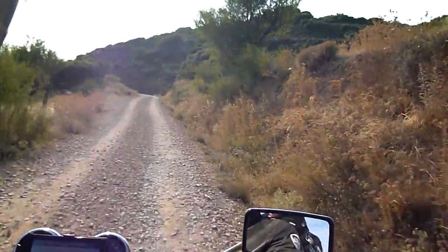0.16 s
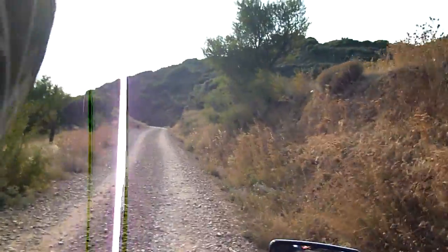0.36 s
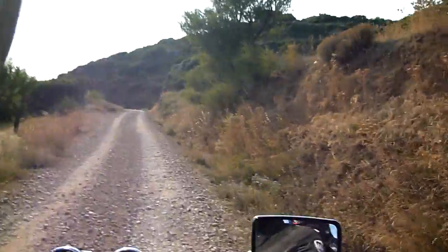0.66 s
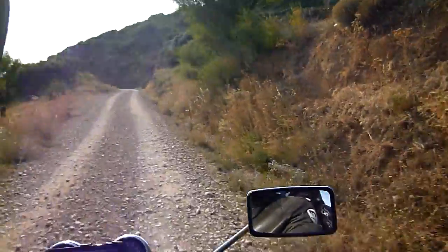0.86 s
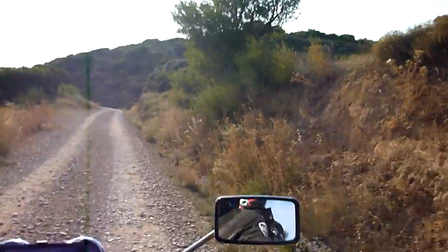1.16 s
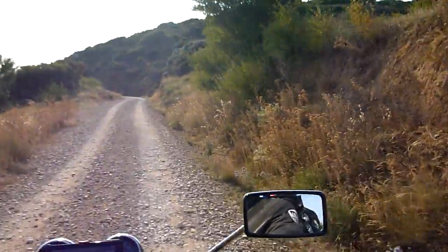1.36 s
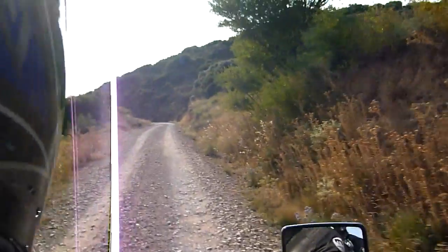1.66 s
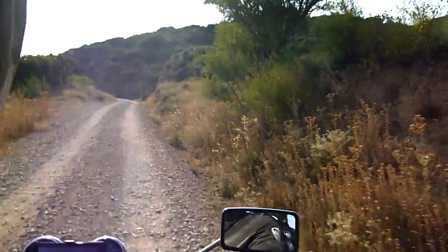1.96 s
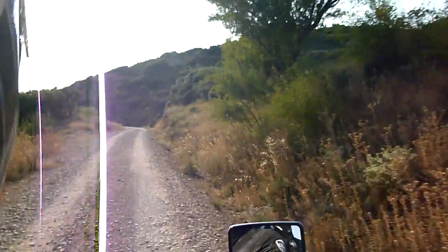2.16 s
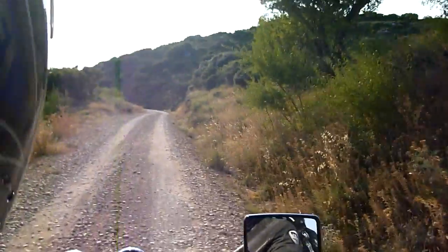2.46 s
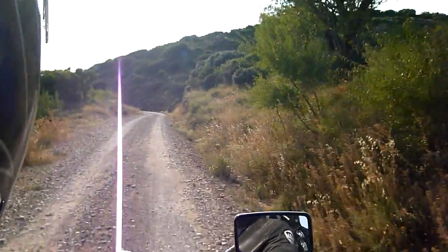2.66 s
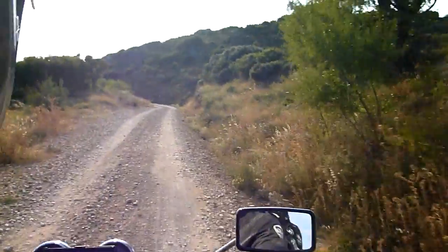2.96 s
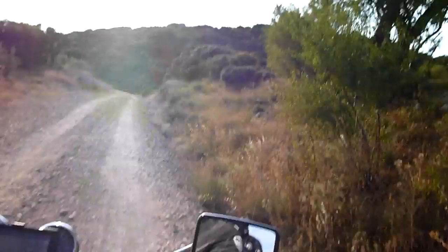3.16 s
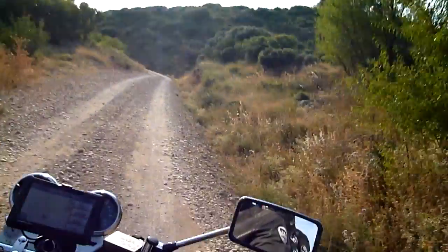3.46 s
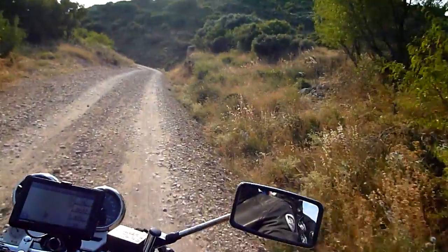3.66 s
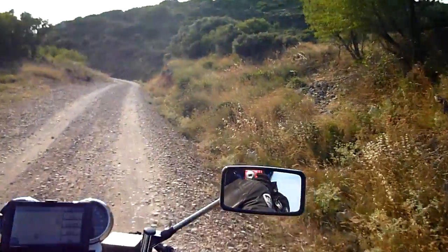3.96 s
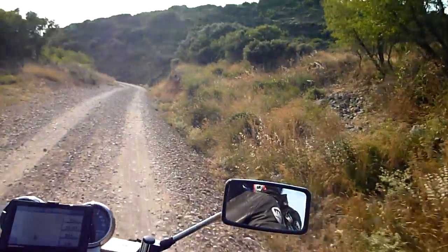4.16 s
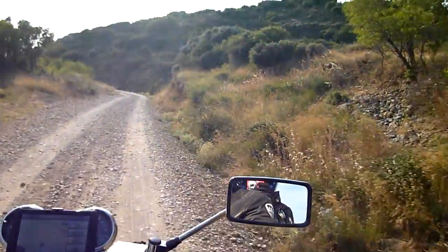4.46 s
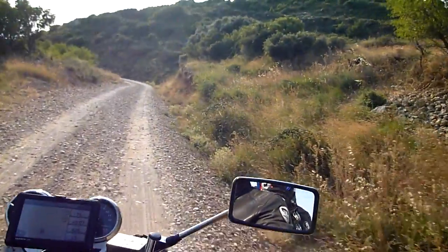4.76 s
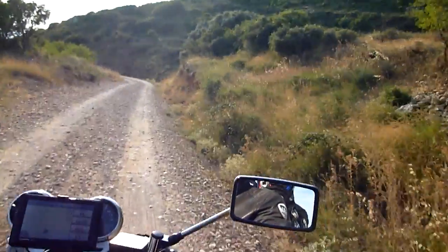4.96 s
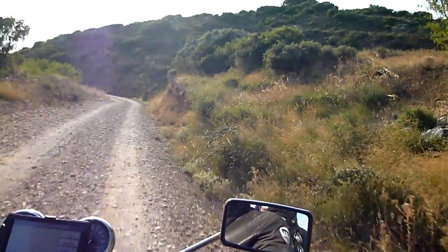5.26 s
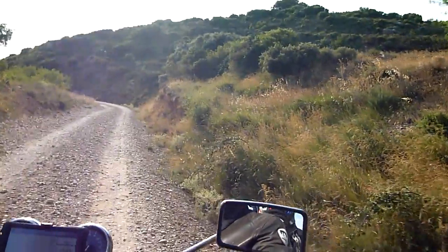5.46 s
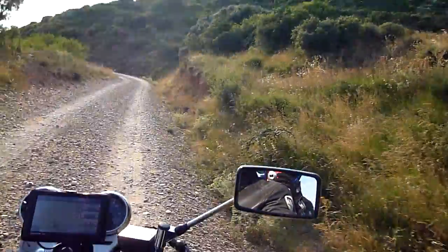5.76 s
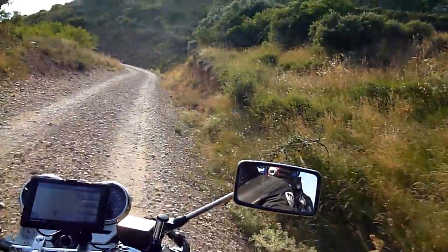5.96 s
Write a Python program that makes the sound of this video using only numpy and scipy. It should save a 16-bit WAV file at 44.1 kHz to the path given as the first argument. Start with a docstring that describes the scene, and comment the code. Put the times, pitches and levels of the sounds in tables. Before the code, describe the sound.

A low, throbbing motorcycle engine at roughly fifty beats a second, close and bassy, alternates between rough barks and dull coasting. Gravel roars and fizzes under the wheels, with dry panel knocks, a short heavy suspension thump midway, and a few metallic stone ticks. Faint bird chirps and thin insect shrilling lie far behind. The knocking thins out and the engine finally holds an even pull. Open air, dulled helmet microphone.

```python
"""Wheels rumble and crunch over gravel, a loose part knocks, and a motorcycle engine barks in short surges.
It rolls on a nearly shut throttle, pulls evenly for a while, coasts and surges again, then settles.
The engine is a train of shaped exhaust pulses over a once-a-cycle throb; the tyres are coloured noise and clicks.
Loose parts, flicked stones and a bump are struck resonances; faint insects and a bird sit beside the track.
All of it is heard through the housing of a helmet camera."""
import sys
import numpy as np
from scipy import signal
from scipy.fft import rfft, irfft
from scipy.io import wavfile
from scipy.ndimage import uniform_filter1d

SR = 44100
rng = np.random.default_rng(int(sys.argv[2]) if len(sys.argv) > 2 else 0)


def to_wav(sig):
    """Store sig (one row per channel, or 1-D mono) as 16-bit WAV at the path in sys.argv[1].

    Samples outside -1..1 are clipped; the rate is SR.
    """
    pcm = np.clip(np.atleast_2d(sig), -1, 1) * 32767
    pcm = np.round(pcm).astype(np.int16)
    wavfile.write(sys.argv[1], SR, pcm.T)  # frames by channels


N = 269451
TIME = np.arange(N) / SR

# base engine speed, held by the rolling wheels; one exhaust stroke a cycle: time_s, speed_cycles_per_s
ENGINE_SPEED = [(0, 53.1), (0.2, 54), (0.6, 54), (1.15, 54.5), (1.33, 52.9), (1.53, 53.77), (1.65, 55.9),
                (1.78, 55.22), (2.05, 54.77), (2.24, 55.27), (2.35, 54.68), (2.6, 55.23), (2.87, 56.89),
                (3.05, 54), (3.3, 52.32), (3.8, 52.74), (4.35, 50.36), (4.7, 51.4), (5.15, 49.54),
                (5.45, 47.82), (5.8, 47.9), (6.11, 48.5)]
# surges in which the cylinders fire: start_s, end_s, base level_db of the bark,
# swell_db from start to end, stumble_db of the second stroke (offset)
FIRING_SURGES = [(0.079, 0.119, -21.5, -1, 0), (0.186, 0.24, -21.5, 6, 4), (0.314, 0.351, -22.5, 3, 2.5),
                 (0.442, 0.5, -20, 2.5, -1), (0.59, 0.593, -22.5, 5, 0), (0.702, 0.79, -23.5, -4.5, -3.5),
                 (0.851, 1.077, -22.5, 0.5, -9), (1.139, 1.226, -22, 1, -1), (1.287, 1.483, -22, 0.5, 0),
                 (1.512, 1.572, -22.5, 0, 1), (1.584, 1.704, -22, -2.5, 0.5), (1.731, 2.065, -22.5, 0, 0),
                 (2.094, 2.271, -22, 2, -1.5), (2.31, 2.604, -24, -2.5, -1.5), (2.619, 2.944, -24.5, 2, 2),
                 (2.956, 3.107, -24, -0.5, 0), (3.197, 3.245, -24, 1, 1), (3.307, 3.34, -24.5, 4, 2),
                 (3.376, 3.452, -20.5, 5, -4.5), (3.618, 3.665, -23, 0, 3), (3.768, 3.806, -22, 5, 4.5),
                 (3.917, 3.955, -24.5, -5, -3), (4.068, 4.1, -27.5, -1, 2), (4.221, 4.259, -25, 0, -1),
                 (4.338, 4.383, -20.5, 0.5, -18), (4.493, 4.543, -23.5, 3.5, -10),
                 (4.654, 4.712, -21, 0.5, -9), (4.815, 4.883, -22, -1, -13), (4.978, 5.019, -23.5, -4, -7),
                 (5.143, 5.215, -21.5, -3, -25), (5.244, 5.276, -22, -1, -0.5),
                 (5.305, 5.383, -22.5, 9.5, -12), (5.413, 5.44, -22.5, 0, -3), (5.473, 5.548, -22, 4, -12),
                 (5.576, 5.608, -23, 3, 0), (5.64, 6.113, -22.5, 0, -3)]
# roar of the stones under the tyres: time_s, level_db
GRAVEL_ROAR = [(0, -43.5), (0.3, -40.5), (0.6, -47), (0.98, -37.5), (1.35, -43.5), (2.4, -43.5),
               (2.9, -42.5), (3.43, -45), (3.58, -47.5), (4.7, -49.5), (6.11, -51)]


def gain_of(db):
    """Turns decibels into amplitude."""
    return 10 ** (np.asarray(db) / 20)


def evened(x):
    """Scales to rms 1."""
    return x / np.sqrt(np.mean(x ** 2) + 1e-20)


def curve(rows):
    """Draws a time table as an automation line with a value at every sample."""
    return np.interp(TIME, *np.transpose(rows))


def read(points, hz):
    """Reads a spectrum table as gains at the given frequencies."""
    f, db = np.transpose(points)
    return gain_of(np.interp(np.log(hz + 1), np.log(f + 1), db))


def coloured(x, points):
    """Filters x through a spectrum table, at rms 1."""
    gain = read(points, np.fft.rfftfreq(N, 1 / SR))
    return evened(irfft(rfft(x) * gain, N))


def wander(hz):
    """Slow random drift of rms 1: noise through a soft lowpass at about hz."""
    f = np.fft.rfftfreq(N, 1 / SR)
    return evened(irfft(rfft(rng.standard_normal(N)) * np.exp(-(f / hz) ** 2), N))


def lagged(x, lag_s):
    """Follows x with a time constant."""
    keep = np.exp(-1 / (lag_s * SR))
    return signal.lfilter([1 - keep], [1, -keep], x)


def add(mix, s, sound):
    """Mixes a sound in at time s."""
    part = mix[max(round(s * SR), 0):][:len(sound)]
    part += sound[:len(part)]


def causal(gain):
    """The most compact pulse with these gains that starts at time zero (minimum phase)."""
    cepstrum = irfft(np.log(gain))
    size = len(cepstrum)
    cepstrum = cepstrum[:size // 2]
    cepstrum[1:] *= 2
    return irfft(np.exp(rfft(cepstrum, size)))[:size // 2]


def click(points, tilt_db, size=2048):
    """A dry click with peak 1: a spectrum table, tilted in dB per octave about 1 kHz."""
    hz = np.fft.rfftfreq(size, 1 / SR)
    tilt = gain_of(tilt_db * np.log2(np.maximum(hz, 450) / 1000))
    pulse = causal(read(points, hz) * tilt)
    return pulse / abs(pulse).max()


def strike(modes, tilt_db, scatter, grit, contact_s, crack=0, crack_s=0.00092, size=4000):
    """One blow with peak 1: after a short crack each mode rings, part pure tone and part rough chatter."""
    t = np.arange(size) / SR
    out = np.zeros(size)
    for hz, db, t60 in modes:
        detune, force, phase = rng.standard_normal(3)
        smoothing = np.hanning(SR // 250)  # 4 ms
        chatter = evened(np.convolve(rng.standard_normal(size), smoothing, "same"))
        tone = np.sin(2 * np.pi * (hz * (1 + scatter * detune) * t + phase))
        brightness_db = tilt_db * np.log2(hz / modes[0][0])
        decay_db = -60 * t / t60
        out += tone * (1 + grit * chatter) * gain_of(db + force + brightness_db + decay_db)
    out *= 1 + crack * np.exp(-t / crack_s)
    out *= 1 - np.exp(-(t / contact_s) ** 2)  # a soft contact makes no click
    return out / abs(out).max()


def bird(chirp_s=0.07, sweep=0.09, blur_hz=260):
    """A far bird gives faint chirps that rise in pitch, blurred by the scrub."""
    # start_s, level_db, centre pitch_hz
    chirps = [(1.5, -67, 6100), (1.94, -67, 7400), (2.04, -69, 6000), (2.11, -65, 6600), (2.65, -63, 7470),
              (2.826, -65, 5900), (2.915, -65, 5900), (3.015, -68, 5874), (3.099, -64, 6000),
              (3.13, -66, 6936), (3.19, -68, 6000)]
    u = np.linspace(-.5, .5, round(chirp_s * SR))
    out = np.zeros(N)
    for s, db, hz in chirps:
        phase = 2 * np.pi * np.cumsum(hz * (1 + sweep * u)) / SR
        add(out, s, gain_of(db) * np.cos(np.pi * u) * np.sin(phase))
    return out * wander(blur_hz)


def insects(patchy_db=2):
    """Insects shrill in the dry grass: band noise in patches that drift over time and pitch."""
    # time_s, level_db
    insect_level = [(0, -87.5), (2, -71), (3.45, -82), (3.75, -68.5), (4.2, -66.5), (4.8, -68.5),
                    (5.7, -69), (6.11, -74.5)]
    # frequency_hz, relative density_db_per_hz
    shrill_band = [(4000, -56.5), (5500, -10), (6000, -9.5), (7400, -7.5), (8000, -10), (8600, -25.5),
                   (11000, -68)]
    z = signal.stft(coloured(rng.standard_normal(N), shrill_band), nperseg=512)[2]
    patches = uniform_filter1d(rng.standard_normal(z.shape), size=7, axis=0)  # across pitch
    patches = evened(uniform_filter1d(patches, size=14, axis=1))  # across time
    shrill = signal.istft(z * gain_of(patchy_db * patches), nperseg=512)[1][:N]
    return evened(shrill) * gain_of(curve(insect_level))


def ruts():
    """The wheels rumble over ruts: low coloured noise riding a level curve."""
    # time_s, level_db
    rut_level = [(0, -32), (0.13, -26.5), (0.4, -35.5), (0.95, -26.5), (1.4, -38.5), (3.0, -29.5),
                 (3.2, -26.5), (3.43, -22.5), (3.6, -32), (4.2, -29.5), (4.7, -36), (5.4, -30.5),
                 (6.11, -43)]
    # frequency_hz, relative density_db_per_hz
    rumble_colour = [(10, -44.5), (25, -18.5), (40, 4), (85, 5.5), (130, 5.5), (230, 5), (300, 3),
                     (400, -11), (520, -18), (900, -51), (4000, -100)]
    return coloured(rng.standard_normal(N), rumble_colour) * gain_of(curve(rut_level))


def stones(per_s, spread_db, wash):
    """Clicks of many sizes over a wash of finer grit."""
    sizes = gain_of(spread_db * np.minimum(rng.exponential(1, N), 4))
    clicks = sizes * rng.choice([-1, 1], N) * (rng.random(N) < per_s / SR)
    return evened(clicks) + wash * rng.standard_normal(N)


def gravel(lump_db=2, clump_db=1.18, flicker_db=0.9):
    """The tyres crush gravel: a lumpy roar, with crunch and fizz that clump together and follow it in part."""
    # spectra: frequency_hz, relative density_db_per_hz
    roar_colour = [(100, -25), (300, -1), (470, -6.5), (560, -3.5), (680, -8.5), (850, -14), (1300, -23.5),
                   (5000, -73)]
    crunch_colour = [(100, -38.5), (500, -0.5), (850, -16), (1080, -1.5), (1400, -4.5), (1480, -3),
                     (1545, 0.5), (1620, -5), (2000, -6), (2500, -11.5), (3300, -22.5), (5000, -50),
                     (12000, -79.5)]
    fizz_colour = [(1500, -6.5), (3500, -0.5), (4600, -0.5), (6000, -1), (7400, -0.5), (8450, -3),
                   (8750, 0.5), (9100, -2), (9600, -0.5), (9900, -1.5), (10300, 0), (11200, -9.5),
                   (12100, -13.5), (12900, -10.5), (13500, -12), (14400, -18), (15700, -20.5)]
    clumps, roar_db = wander(23), curve(GRAVEL_ROAR)
    above_loose_db = roar_db + 42  # roar relative to loose gravel at -42 dB
    roar = coloured(stones(per_s=400, spread_db=5.0, wash=1.4), roar_colour)
    crunch = coloured(stones(per_s=900, spread_db=-1.0, wash=0.83), crunch_colour)
    fizz = coloured(stones(per_s=1300, spread_db=2.0, wash=1.3), fizz_colour)
    roar *= gain_of(roar_db + lump_db * wander(31))
    # level at the loose-gravel roar, then dB for each dB of roar
    crunch *= gain_of(-53 + 0.37 * above_loose_db + clump_db * clumps)
    fizz *= gain_of(-62.5 + 0.26 * above_loose_db + flicker_db * clumps)
    return roar + crunch + fizz


def tick(db, tilt_db, scrape_s=0.004, ring_db=-8):
    """A stone scrapes briefly on metal and leaves a faint ring."""
    # resonances: pitch_hz, relative level_db, t60_s
    metal_modes = [(3760, 5, 0.047), (4570, -6, 0.02), (6070, -3, 0.025), (7350, -3, 0.019),
                   (8750, -3, 0.019), (10200, 0, 0.024)]
    # frequency_hz, relative level_db
    scrape_colour = [(1000, -22), (3500, 4), (7000, -4.5), (10200, 0), (12000, -12), (16000, -17)]
    ring = strike(metal_modes, tilt_db, scatter=0.031, grit=0.79, contact_s=0.0001, crack=1.0)
    t = np.arange(len(ring)) / SR
    burst = rng.standard_normal(len(t)) * np.exp(-t / scrape_s)
    scrape = signal.fftconvolve(burst, click(scrape_colour, tilt_db))[:len(t)]
    return gain_of(db) * (scrape / abs(scrape).max() + gain_of(ring_db) * ring)


def flicked_stones():
    """A few stones are flicked against metal."""
    # start_s, level_db, brightness_db_per_octave
    stone_ticks = [(0.688, -48, -8), (1.026, -41.5, -4), (1.582, -49, 9), (1.745, -50, 2), (2.787, -44, 0),
                   (2.8, -45.5, 3), (2.857, -52, 4)]
    out = np.zeros(N)
    for s, db, tilt_db in stone_ticks:
        add(out, s, tick(db, tilt_db))
    return out


def suspension():
    """A heavy bump through the suspension sets the chassis ringing low and short."""
    # start_s, peak_db
    bumps = [(2.513, -13)]
    # resonances: pitch_hz, relative level_db, t60_s
    chassis_modes = [(110, -2, 0.11), (194, 2, 0.036), (240, -10.5, 0.037)]
    out = np.zeros(N)
    for s, db in bumps:
        add(out, s, gain_of(db) * strike(chassis_modes, 0, scatter=0.033, grit=0.23, contact_s=0.0022))
    return out


def knock(db, tilt_db, ring_db=-10):
    """A loose part smacks a well damped panel, which rings only a little."""
    # resonances: pitch_hz, relative level_db, t60_s
    panel_modes = [(467, 1, 0.059), (580, 0, 0.015), (664, -2, 0.032), (730, 1.5, 0.023), (900, 9, 0.017),
                   (960, 5.5, 0.11), (1110, 5.5, 0.02), (1270, -6.5, 0.034), (1551, -7.5, 0.065),
                   (1810, -8, 0.024), (2330, -11.5, 0.036)]
    # dry smack: frequency_hz, relative level_db
    smack_colour = [(100, -41), (450, -6.5), (620, -1), (850, 1), (1150, -1.5), (1500, -14.5),
                    (2000, -22.5), (2700, -31.5), (5000, -62), (12000, -94)]
    ring = strike(panel_modes, tilt_db, scatter=0.048, grit=0.63, contact_s=0.00083, crack=0.84)
    out = gain_of(ring_db) * ring
    add(out, 0, click(smack_colour, tilt_db))
    return gain_of(db) * out


def jiggles(per_s=5, above_roar_db=2, spread_db=3):
    """Loose parts tap lightly at random all the way, harder where the gravel roars louder."""
    out = np.zeros(N)
    level = curve(GRAVEL_ROAR) + above_roar_db + spread_db * rng.standard_normal(N)
    for i in np.flatnonzero(rng.random(N) < per_s / SR):
        add(out, TIME[i], knock(level[i], tilt_db=0.0))
    return out


def loose_parts(rebound_s=0.0068, rebound_db=-10, clatter_s=0.023, clatter_db=-14.5):
    """The hardest knocks: each part falls back once and clatters in three weaker taps at random moments."""
    # start_s, level_db, brightness_db_per_octave
    hard_knocks = [(0.037, -30.5, 1), (0.228, -37, 7), (0.279, -21.5, -4), (0.536, -34.5, 5),
                   (0.655, -33.5, -4), (0.689, -33, -4), (0.948, -30, 7), (0.957, -24, 6),
                   (0.9927, -13.5, -7.5), (1.082, -29, -6), (1.12, -29, -3), (1.16, -32, 6),
                   (1.1671, -19, 1.5), (1.218, -39, -7), (1.438, -40, 9), (1.54, -30.5, 0.5),
                   (1.737, -28, -3.5), (1.958, -29.5, -1), (2.095, -36.5, 2), (2.143, -35, 3),
                   (2.587, -43, 1), (2.684, -23.5, -5.5), (2.702, -32, 2), (2.7111, -28, 7),
                   (2.741, -33, 2), (2.773, -34, 11), (2.941, -44, -5), (3.168, -33.5, -12),
                   (3.335, -26, -7.5), (3.35, -27, -19), (3.49, -32, -19), (3.978, -35, -8),
                   (5.0584, -27.5, 2), (5.062, -34, -8), (5.479, -36, 2)]
    out = np.zeros(N)
    for s, db, tilt_db in hard_knocks:
        add(out, s, knock(db, tilt_db))
        add(out, s + rebound_s, knock(db + rebound_db, tilt_db))
        for later_s in clatter_s * rng.random(size=3):
            add(out, s + later_s, knock(db + clatter_db, tilt_db))
    return out


def burning():
    """1 while the cylinders fire, 0 in the pauses."""
    return sum((TIME >= start) & (TIME < end) for start, end, *_ in FIRING_SURGES)


def crank_speed(lurch_share=.09, rise_s=.04, settle_s=.1, waver=0.0032):
    """Firing speeds the crank up through the slack of the chain until the wheels pull it back."""
    push = burning() - .5
    lurch = lagged(push, rise_s) - lagged(push, settle_s)
    return curve(ENGINE_SPEED) * (1 + lurch_share * lurch + waver * wander(22))


def crank_turns(pause_s=.028):
    """Cycles turned so far; in each pause the crank slips, so that the next surge opens with a stroke."""
    turns, last_end = np.cumsum(crank_speed()) / SR, 0
    for start, end, *_ in FIRING_SURGES:
        if start - last_end > pause_s:  # a shorter gap is only a misfire: the crank keeps its step
            due = np.interp(start, TIME, turns)
            slip = np.round(due) - due
            turns = turns + curve([(last_end, 0), (start, slip)])
        last_end = end
    return turns


def throb(turns, db=-33, sag_db=-5, sag_s=0.0062, waver_db=0.2, waver_hz=24, lag=0.34):
    """The once-a-cycle throb of the crank, a sine that is weaker in the pauses."""
    level = db + sag_db * lagged(1 - burning(), sag_s) + waver_db * wander(waver_hz)
    return np.sqrt(2) * np.cos(2 * np.pi * (turns - lag)) * gain_of(level)


def pulse_shape(points, tilt_db=0, rasp_db=0, echo_s=0.010333, echo_share=0.4, size=8192):
    """One stroke with its round trips in the exhaust pipe, evened, then tilted about 280 Hz and shelved on top."""
    hz = np.fft.rfftfreq(size, 1 / SR)
    pipe = 1 / abs(1 - echo_share * np.exp(-2j * np.pi * hz * echo_s))
    octaves = np.log2(np.clip(hz, 80, 290) / 280)
    shelf_db = np.interp(hz, [300, 440], [0, rasp_db])
    return causal(evened(read(points, hz) * pipe) * gain_of(tilt_db * octaves + shelf_db))


def engine(catch_db=1, uneven_db=0.97, puff_jitter_s=0.0012, puff_uneven_db=3.0):
    """One stroke a cycle: a bark while the engine fires, a dull uneven puff between the surges."""
    # fired and unfired (only pumping air) strokes: frequency_hz, relative level_db
    bark_colour = [(15, -71.5), (35, -36.5), (65, -8), (105, 3.5), (160, -10), (215, -3), (280, 0),
                   (335, -3.5), (385, -15.5), (440, -17.5), (500, -23), (750, -47), (1500, -57),
                   (6000, -100)]
    puff_colour = [(15, -56), (35, -23.5), (65, -1), (100, -1), (150, -12.5), (210, -1.5), (290, -4),
                   (380, -37), (600, -48), (6000, -100)]
    # reference level of the low boom: speed_cycles_per_s, level_db
    boom_level = [(48, -27), (55, -23.5)]
    # unfired strokes: speed_cycles_per_s, level_db, brightness_db_per_octave
    puff_settings = [(50.7, -33, -3), (54, -27, 2)]
    limp_db = -3.5  # lowest offset of every second stroke after the first stumble
    sharpen = 0.39  # dB per octave from boom towards bark, for each dB above the boom
    bite_s, bite_db, bite_rasp_db = 0.19, 1.5, 0.5  # short surges bite: dB per octave, and dB on top
    rasp_db_per_cycle, rasp_from = 0.66, 59.4  # the top opens with speed: dB, cycles per second

    turns = crank_turns()
    times = np.interp(np.arange(np.floor(turns[-1]) + 1), turns, TIME)
    speed = np.interp(times, *np.transpose(ENGINE_SPEED))
    force, late = rng.standard_normal((N, 2))[:len(times)].T
    boom_db = np.interp(speed, *np.transpose(boom_level))
    exhaust, idle = np.zeros(N), np.ones(len(times), bool)
    for start, end, db, swell_db, stumble_db in FIRING_SURGES:
        firing = np.flatnonzero((times > start - 2 / SR) & (times < end))
        idle[firing] = False
        bite = np.exp((start - end) / bite_s)
        for count, i in enumerate(firing):
            # unburnt fuel gives the first stroke an extra kick; the second may stumble
            kick_db = catch_db * (count == 0)
            alternate_db = stumble_db if count == 1 else max(stumble_db, limp_db) * (count % 2)
            along = (times[i] - start) / (end - start) - .5
            level = db + swell_db * along + uneven_db * force[i] + kick_db + alternate_db
            tilt_db = sharpen * (level - boom_db[i]) + bite_db * bite
            rasp_db = rasp_db_per_cycle * (speed[i] - rasp_from) + bite_rasp_db * bite
            add(exhaust, times[i], gain_of(level) * pulse_shape(bark_colour, tilt_db, rasp_db))
    at_speed, *columns = np.transpose(puff_settings)
    for i in np.flatnonzero(idle):
        db, tilt_db = (np.interp(speed[i], at_speed, column) for column in columns)
        puff = gain_of(db + puff_uneven_db * force[i]) * pulse_shape(puff_colour, tilt_db)
        add(exhaust, times[i] + puff_jitter_s * late[i], puff)
    unit = np.sqrt(SR / speed.mean())  # brings a train of energy-1 pulses to rms 1
    return -(unit * exhaust + throb(turns))  # each stroke opens with a dip in pressure


def scene():
    """Everything is heard from the saddle, in the open air."""
    verge = bird() + insects()
    track = ruts() + gravel() + flicked_stones()
    bike = suspension() + jiggles() + loose_parts() + engine()
    return (verge + track + bike)[None]


def record(dry, low_cut_hz=13, edge_hz=15750):
    """The camera housing cancels three narrow bands, the microphone drops the deepest bass, then a treble limit."""
    # dead spots of the housing: frequency_hz, width_hz
    dead_spots = [(3000, 900), (5200, 770), (11620, 720)]
    hz = np.fft.rfftfreq(N, 1 / SR)
    housing = np.prod([1j * (hz - f) / (1j * (hz - f) + width / 2) for f, width in dead_spots], axis=0)
    bass_cut = hz ** 4 / (hz ** 4 + low_cut_hz ** 4)
    heard = irfft(rfft(dry) * housing * bass_cut, N)
    treble_limit = signal.firwin(511, edge_hz, window=("kaiser", 9), fs=SR)
    return signal.oaconvolve(heard, treble_limit[None], "same")


dry = scene()
out = record(dry)
to_wav(out)
```